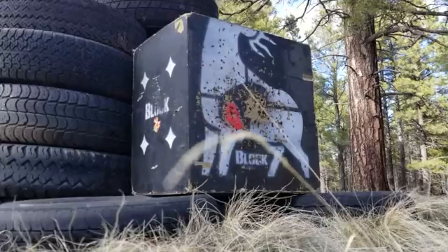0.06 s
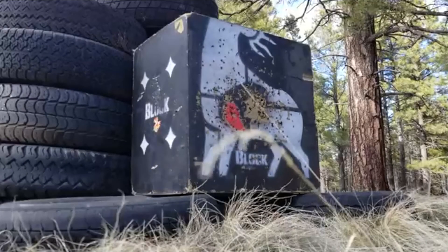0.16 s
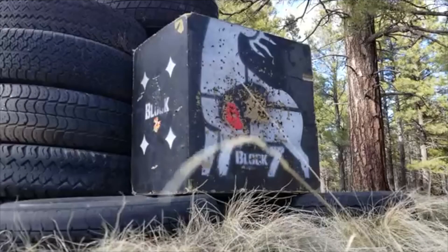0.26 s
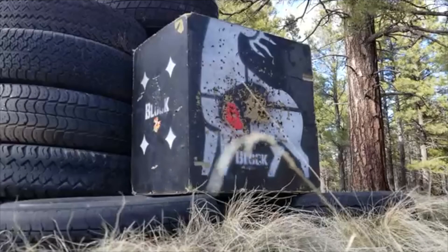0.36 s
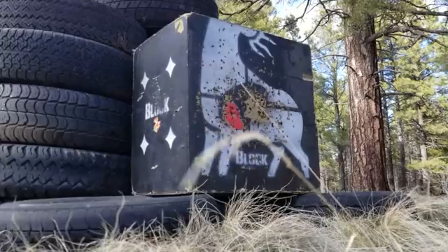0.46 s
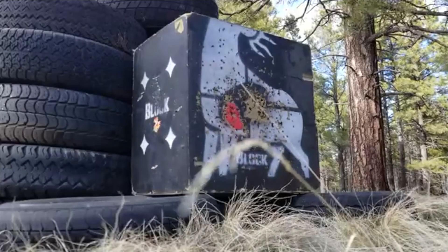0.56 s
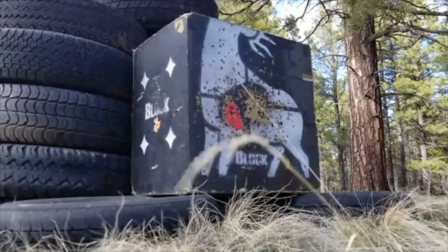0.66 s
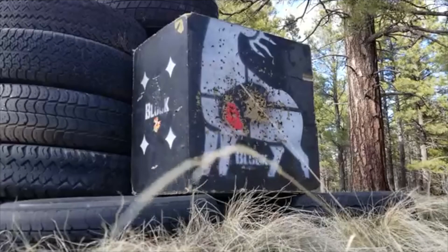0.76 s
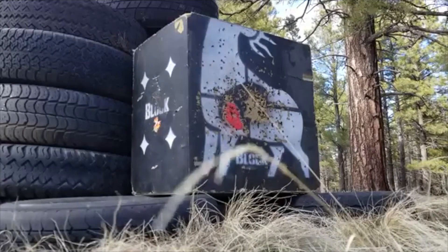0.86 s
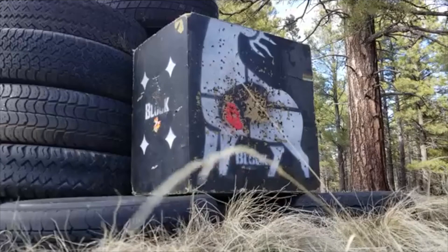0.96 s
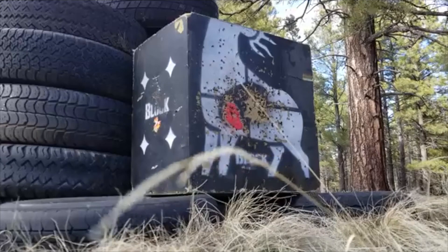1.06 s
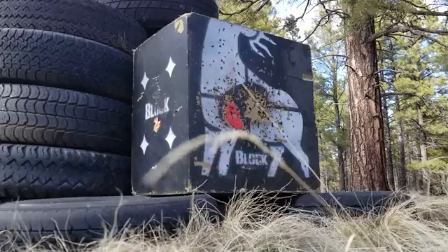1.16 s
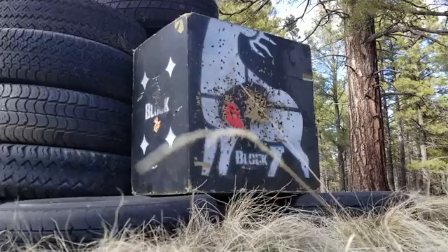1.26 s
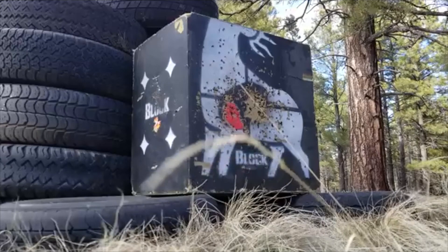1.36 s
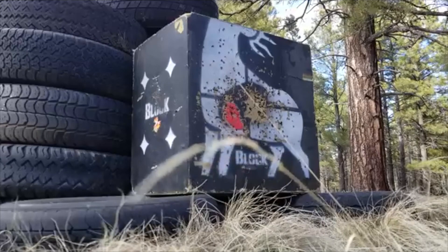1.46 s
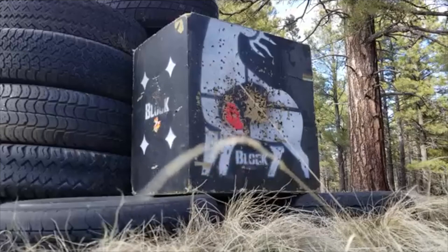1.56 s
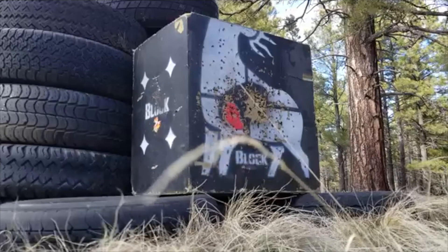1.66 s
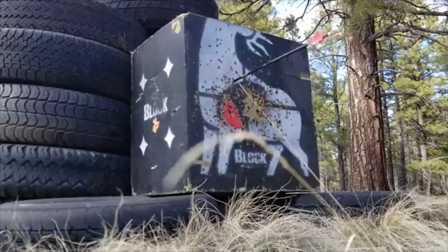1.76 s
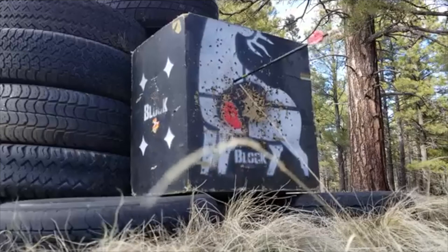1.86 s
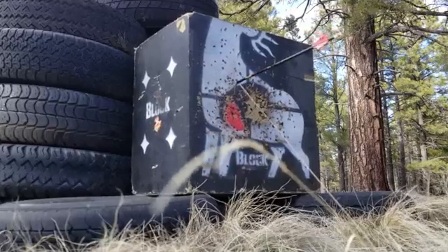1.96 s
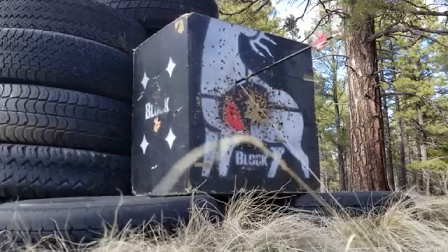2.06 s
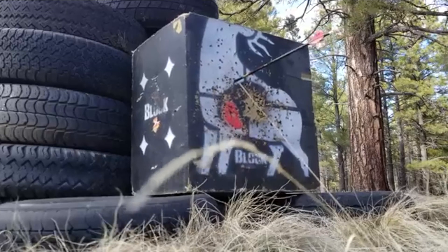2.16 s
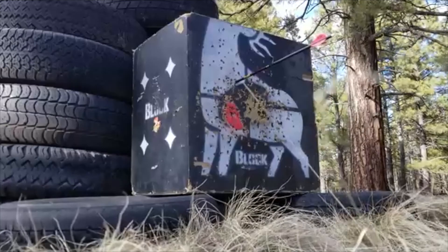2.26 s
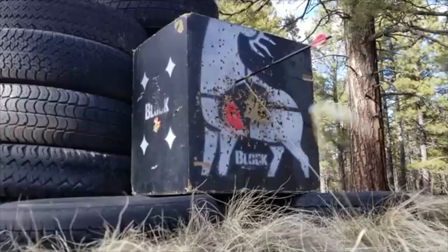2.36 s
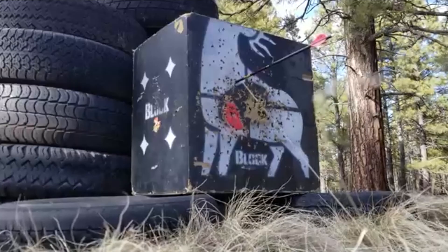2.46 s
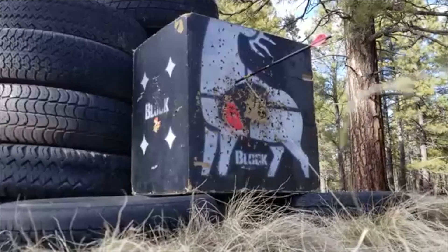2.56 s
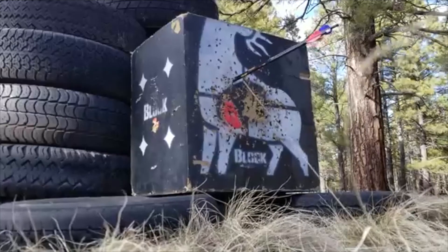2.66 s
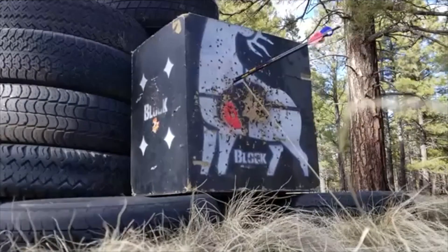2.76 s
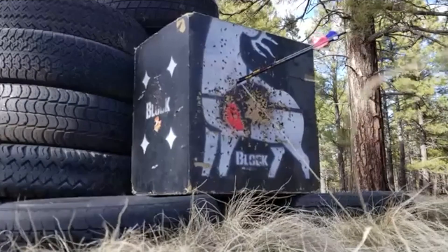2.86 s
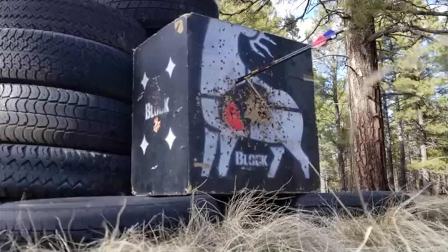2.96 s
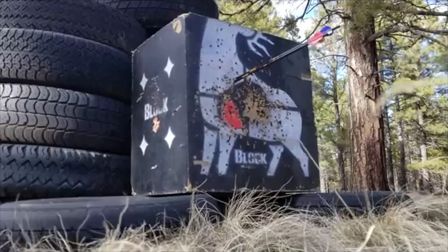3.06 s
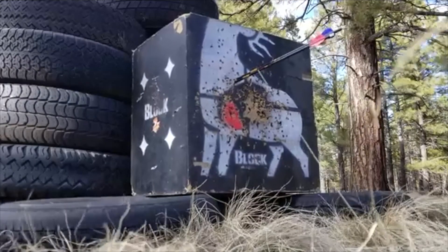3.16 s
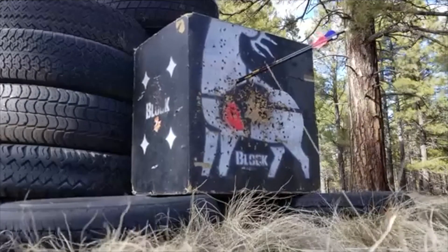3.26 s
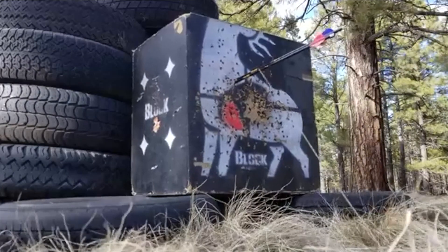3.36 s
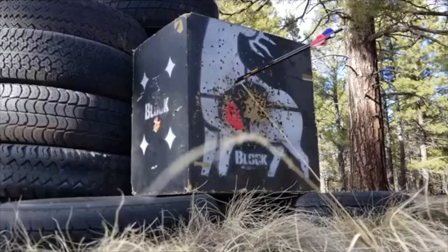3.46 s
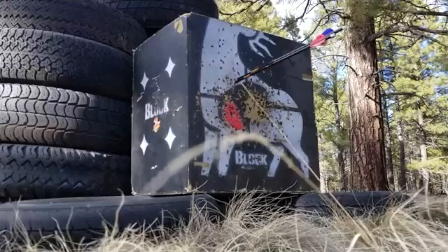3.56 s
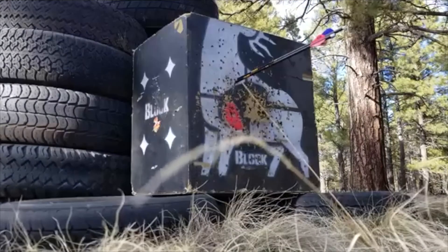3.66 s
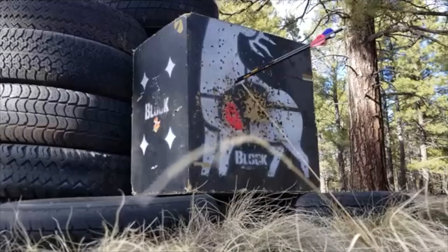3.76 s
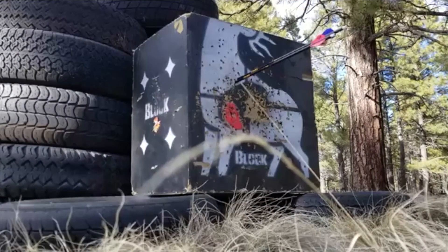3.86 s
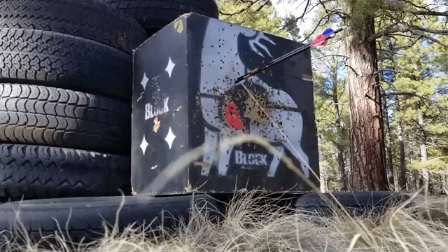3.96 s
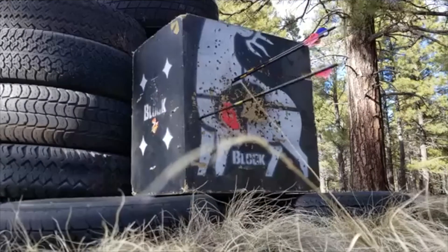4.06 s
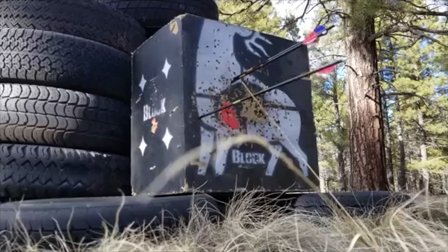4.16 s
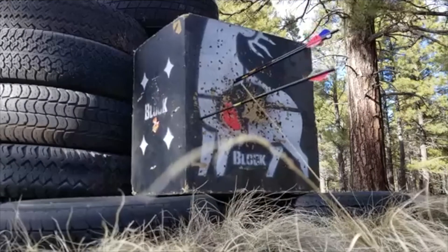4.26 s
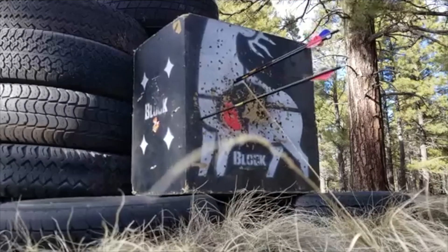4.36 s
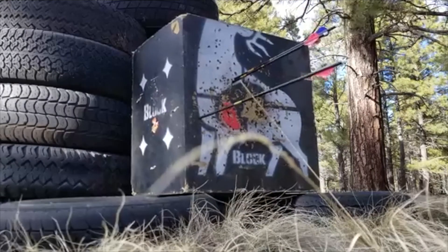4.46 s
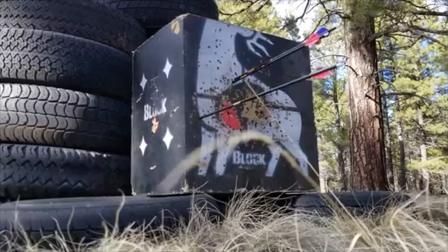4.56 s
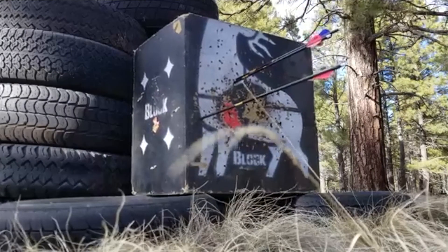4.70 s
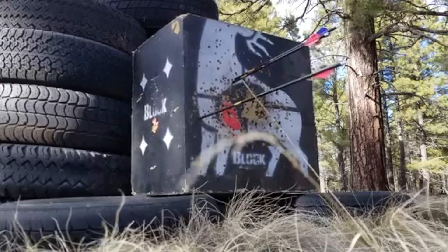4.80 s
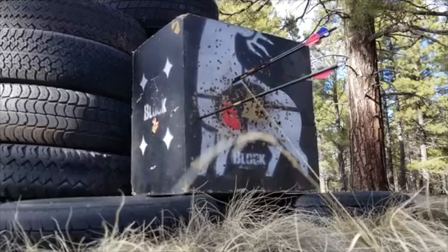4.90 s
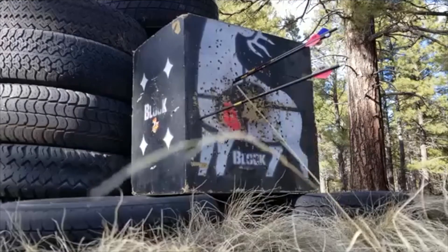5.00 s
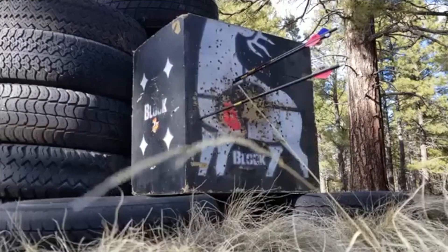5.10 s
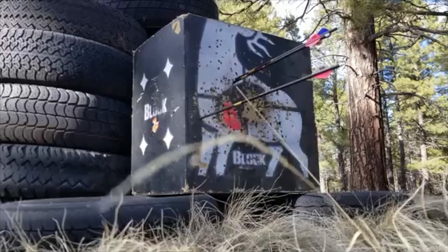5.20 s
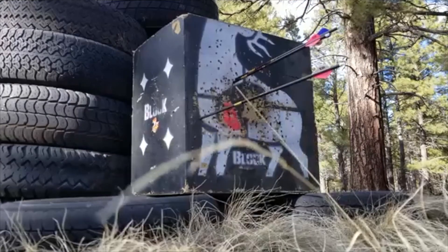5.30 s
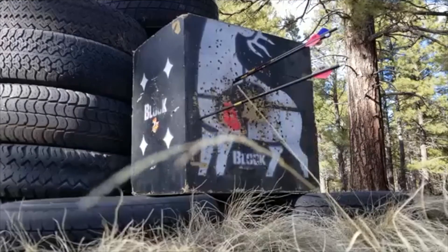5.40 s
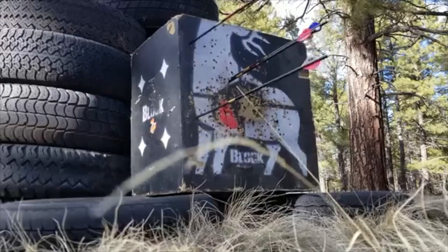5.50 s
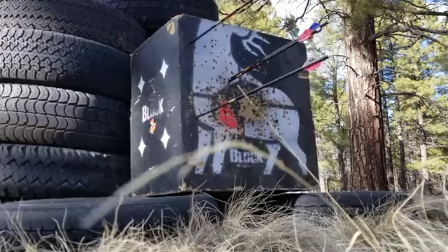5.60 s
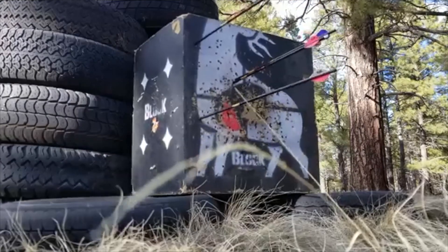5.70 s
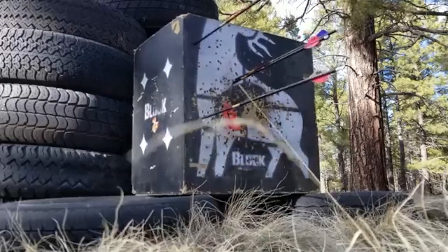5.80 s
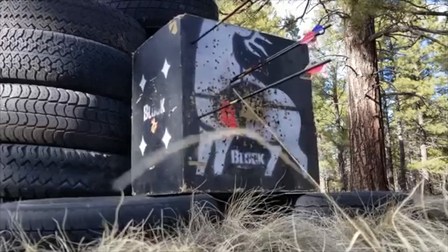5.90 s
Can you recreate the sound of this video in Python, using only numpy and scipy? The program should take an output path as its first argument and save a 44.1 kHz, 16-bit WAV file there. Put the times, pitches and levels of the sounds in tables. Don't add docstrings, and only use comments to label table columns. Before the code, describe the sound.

In a quiet pine wood, four sharp arrow hits crack and thump into a foam target, each followed by a brief scattered echo.

```python
import sys
import numpy as np
from scipy import signal
from scipy.fft import rfft, irfft
from scipy.io import wavfile
from scipy.ndimage import uniform_filter1d

SR = 44100
rng = np.random.default_rng(int(sys.argv[2]) if len(sys.argv) > 2 else 0)


def boost(x):
    u = np.asarray(x, float) / 20
    return 10 ** u


def unload_audio(sound):
    columns = np.transpose(np.atleast_2d(sound))
    steps = np.round(np.clip(columns, -1, 1) * 32767)
    wavfile.write(sys.argv[1], SR, steps.astype(np.int16))


N = 261954
T = np.arange(N) / SR

# (start t/s, crown roar level/dB, gain sinks after the hit by/dB)
TAKES = [
    (0, -63, 6.5),
    (2.322, -61, 10.5),
    (3.457, -64.5, 10.5),
    (5.056, -64.5, 8.5),
]
# (tip lands t/s, vane hiss level/dB, tilt/dB per octave, forest level/dB)
ARROWS = [
    (1.7356, 2.8, -1.3, -4),
    (2.6447, 1.5, -0.55, 0.05),
    (4.0424, 1.3, 1, 0.2),
    (5.4758, 2.73, -1.5, 2.5),
]
# (shove t/s, lateness of the lows/s, rocks back t/s, share)
SHOVES = [
    (1.7402, 0.004, 1.7587, -0.22),
    (2.6507, 0.0027, 2.6722, -0.15),
    (4.0456, 0.0027, 4.0643, 0.33),
    (5.4813, 0.0015, 5.4963, -0.1),
]


def shape(spectrum, hz):
    f, db = np.transpose(spectrum)
    return boost(np.interp(np.log(hz + 1), np.log(f), db))


def noise(gain, size=N):
    x = irfft(rfft(rng.standard_normal((2, size))) * gain(np.fft.rfftfreq(size, 1 / SR)), size)
    return x / x.std()


def bell(hz, centre_hz, width_hz):
    return np.exp(-2 * ((hz - centre_hz) / width_hz) ** 2)


def walk(rate):
    k = int(SR / rate)
    held = np.repeat(rng.standard_normal(N // k + 1), k)
    return 1.3 * uniform_filter1d(uniform_filter1d(held, k), k)[:N]


def ring(modes, since):
    t = np.maximum(since, 0)
    return sum(boost(db - 60 * t / t60) * np.sin(2 * np.pi * hz * t) for hz, db, t60 in modes)


def pan(db):
    return boost(np.array([[db], [-db]]) / 2)


def take_at(t):
    return np.searchsorted(np.array(TAKES)[1:, 0], t, side="right")


def duck_db(sink_s):
    take = take_at(T)
    since = np.maximum(T - np.array(ARROWS)[take, 0], 0)
    return -np.array(TAKES)[take, 2] * (1 - np.exp(-(since / sink_s) ** 0.76))


def background():
    # (f/Hz, level/dB per Hz)
    roar_spectrum = [(15, -39), (25, -13), (81, -2), (144, -1.5), (172, -7.5), (200, -7), (283, -11),
                     (312, -10.5), (371, -13.5), (787, -20), (991, -24.5), (1540, -40.5), (2500, -54),
                     (3250, -83.5), (5500, -120)]
    # (f/Hz, level/dB per Hz)
    hiss_spectrum = [(1200, -20), (2000, 1), (3000, 1.5), (5000, -2), (9000, -3.5), (12000, 0), (14500, 0),
                     (16000, -17)]
    lag_s, alike_hz = .00048, 800
    dulling = .06
    roar, swell, sunk_db = 0, walk(1.5), duck_db(.34)
    for centre in 20 * 2 ** np.arange(0, 8, .5):
        common, own = noise(lambda hz: bell(hz, centre, centre * 0.58))
        other = np.roll(own, N // 2)
        apart = min((centre / alike_hz) ** 1.2, 4)
        late = np.roll(common, round(lag_s * SR))
        band = np.array([common + apart * own, late + apart * other]) / np.hypot(1, apart)
        flicker_db = 1.0 * swell + 0.98 * walk(4.9)
        extra_duck_db = dulling * np.log2(centre / 200) * sunk_db
        roar = roar + band * np.sqrt(centre) * boost(flicker_db + extra_duck_db)
    roar = irfft(rfft(roar) * shape(roar_spectrum, np.fft.rfftfreq(N, 1 / SR)), N)

    starts, roar_db, _ = np.array(TAKES)[take_at(T)].T
    fade_db = -1.5 * np.exp(-(T - starts) / .021) * (starts > 0)
    roar = roar / roar.std() * boost(18.5 + roar_db + fade_db + sunk_db) * pan(-1.6)
    hiss = noise(lambda hz: shape(hiss_spectrum, hz)) * boost(-76.5 + .95 * duck_db(.13))
    return roar + hiss


def buffet():
    # (peak t/s, level/dB, swell and fade/dB per s)
    gusts = [
        [(1.7, -47.5, 34.5), (2.7, -44.5, 23), (3.2, -30.5, 71.5), (3.47, -63, 5), (5.07, -60, 0)],
        [(.5, -69, 2.5), (2.34, -42.5, 33.5), (3.05, -43, 21), (3.44, -33, 29.5), (3.47, -73.5, 5.5),
         (5.07, -62, 2.5)],
    ]
    # (f/Hz, level/dB per Hz)
    rumble_spectrum = [(12, -35.5), (20, -6), (65, 4.5), (123, -2), (255, -17.5), (455, -30.5), (560, -30),
                       (700, -41), (910, -66.5), (1540, -120)]
    # (t/s, peak level/dB, f/Hz)
    port_eddies = [
        [(2.828, -25.5, 107), (2.885, -25, 88), (3.033, -28, 117), (3.056, -28, 160), (3.075, -31.5, 130),
         (3.11, -30, 130), (3.128, -26.5, 110), (3.144, -26, 204), (3.228, -30.5, 130), (3.246, -25, 190),
         (3.306, -28, 150), (3.355, -29.5, 101), (3.41, -31, 100)],
        [(2.885, -31.5, 79), (2.945, -34, 100), (3.022, -30, 102), (3.07, -38, 110), (3.26, -28.5, 70),
         (3.293, -27, 110), (3.356, -27.5, 97), (3.445, -27.5, 109)],
    ]
    eddy_turns = [0.62, 1.097]
    bite, bite_times = .08, 2.4
    wind = []
    for port in gusts:
        wind.append(sum(boost(db - slope * np.abs(T - s)) * (take_at(T) == take_at(s)) for s, db, slope in port))
    lumps_db = np.array([3.5 * walk(24), 3.8 * walk(20)]) + duck_db(.34)
    out = noise(lambda hz: shape(rumble_spectrum, hz)) * boost(lumps_db) * wind

    for port, eddies in enumerate(port_eddies):
        for (at, db, hz), (turn, glide) in zip(eddies, rng.uniform(-0.86, 1, (len(eddies), 2))):
            near = slice(round((at - .05) * SR), round((at + .05) * SR))
            t, length = T[near] - at, eddy_turns[port] / hz
            swing = np.sin(2 * np.pi * hz * t * (1 + .15 * glide * t / length) + np.pi * turn)
            ripple = bite * np.sin(2 * np.pi * bite_times * hz * t + np.pi * glide)
            out[port, near] += boost(db) * np.exp(-(t / length) ** 2) * (swing + ripple)
    before = 3.4572 - T
    step = boost(-39) * pan(-14) * (before > 0) * np.exp(-np.abs(before) / .003)
    return out - step


def ticks():
    # (t/s, level/dB, centre f/Hz, width/Hz, t60/s)
    bursts = [(1.236, -66, 6460, 6000, .03), (1.249, -74, 4460, 7000, 1), (3.287, -66, 8000, 12000, .01),
              (3.295, -68, 8080, 12000, .01), (3.55, -76, 4000, 5000, 0.6),
              (4.064, -38, 8960, 11000, 0.014), (4.107, -50, 8000, 10620, 0.026),
              (4.129, -61.5, 10000, 8000, .015), (1.757, -55, 9500, 10940, 0.013),
              (2.325, -74, 3010, 5000, 0.041)]
    out = np.zeros((2, N))
    t = np.arange(SR // 2) / SR
    for s, db, centre_hz, width_hz, t60 in bursts:
        at = round(s * SR)
        burst = noise(lambda hz: bell(hz, centre_hz, width_hz), size=len(t))
        out[:, at:at + len(t)] += burst * boost(db - 60 * t / t60)
    return out


def flight(t, shot):
    # (f/Hz, left level/dB, right level/dB, late/s)
    vanes = [(1300, -9, -15, 0.021), (2520, 4.5, -1.5, .012), (4200, 2.5, 0.5, .006),
             (6800, -2, -4.5, 0.00019), (10500, -2, 0.5, 0.0092), (14100, -6.5, 3, .002)]
    # (before landing t/s, level/dB)
    ports = [
        (0, -46.5),
        (.008, -35.5),
    ]
    clear_db = [-24.5, -19.5, -24.5, -29.5]
    lands, db, tilt_db, _ = ARROWS[shot]
    speed_m_s, miss_m = 60, .72
    fall_db = 38.5
    clear_s, clear_rise_s = .125, .025
    closest, port_db = np.transpose(ports)[..., None]
    out = 0
    for centre, left, right, late in vanes:
        age = (t - lands) * (1 + late / .02)
        away = np.hypot(1, (age + closest) * speed_m_s / miss_m)
        far = boost(clear_db[shot]) / np.sqrt(away) * np.clip((age + clear_s) / clear_rise_s, 0, 1)
        swell = boost(port_db + [[left], [right]]) * np.hypot(boost(-fall_db * np.log10(away)), far)
        flutter_db = 1.5 * walk(150)[:len(t)] + tilt_db * np.log2(centre / 5000)
        band = noise(lambda hz: bell(hz, centre, centre * .6), size=len(t))
        out = out + band * swell * boost(flutter_db)
    out = out * (t < lands)
    out = out + .25 * np.roll(out, round(.00016 * SR), axis=1)
    return out * boost(db - 2.5)


def snaps(t):
    # (t/s, sharpness 0-1, left minus right level/dB)
    skin_bursts = [(1.73598, .45, -2), (2.64538, .5, -2), (4.04300, .65, -2), (5.47576, .7, -3)]
    # (t/s, peak level/dB, sharpness 0-1, left minus right level/dB, direction)
    snap_backs = [(1.73630, -11, .3, -2, -1), (1.73655, -12, .3, -2, 1), (2.64615, -12, .4, -1, -1),
                  (4.04310, -7, .8, -2, -1), (4.04328, -7, .9, -3, 1), (4.04341, -4.5, 1, -3, 1),
                  (5.47586, -3, .95, -3, -1), (5.4762, -7, .85, -4, 1), (5.4783, -15, .1, -7, -1),
                  (5.4788, -14, .1, -7, -1)]
    # (f/Hz, level/dB, t60/s)
    shaft = [(1000, -9, .004), (1900, 1, .0036), (3400, -4, .002), (5200, -4, .0022), (8000, -3, .003),
             (10500, -4, .0026), (13500, -6, .002)]
    foam_damp = .65
    touches = [(s - .00016, -11.5, sharp - .27, pan_db, 1) for s, sharp, pan_db in skin_bursts]
    bursts = [(s, -1.6, sharp, pan_db, 1) for s, sharp, pan_db in skin_bursts]
    out, since = np.zeros((2, len(t))), np.arange(300) / SR
    for s, db, sharp, pan_db, direction in touches + bursts + snap_backs:
        at = round((s - t[0]) * SR) - 2
        if 0 <= at < len(t):
            modes = []
            for hz, mode_db, t60 in shaft:
                bright_db = 8 * (sharp - .5) * np.log2(hz / 2000)
                modes.append((hz, mode_db + bright_db, t60 * (foam_damp if hz > 2000 else 1)))
            body, edge = ring(modes[:2], since + .00008), ring(modes[2:], since)
            left, right = body + boost(4.0) * np.roll(edge, shift=1), body + edge
            spike = np.array([left, right]) / right.max()
            out[:, at:at + len(since)] -= direction * spike * boost(db) * pan(pan_db) * boost(pan_db / 2)
    return out


def scrape(t, shot):
    # (level/dB, length/s, squeak f/Hz, grit level/dB)
    scrapes = [
        (-23.5, 0.013, 950, -7.5),
        (-30.5, 0.011, 1400, -1.5),
        (-28.5, 0.012, 1500, 6.5),
        (-22, 0.0079, 1810, 5.5),
    ]
    db, length, squeak_hz, grit_db = scrapes[shot]
    part = (t - ARROWS[shot][0]) / length
    squeak = noise(lambda hz: bell(hz, squeak_hz, 1100), size=len(t))[0] * np.exp(-np.abs(part) ** 3.0)
    grit = noise(lambda hz: bell(hz, 6000, 9000), size=len(t)) * boost(grit_db - 34 * np.abs(part))
    return boost(db) * (part > 0) * (squeak * pan(-1.5) + grit * pan(-5.0))


def boom(t, shot):
    # (f/Hz, level/dB, t60/s, direction)
    modes_1 = [(114, -28.7, 0.124, 1), (175, -10.5, 0.032, -1), (274, -12.8, 0.094, 1),
               (342, -13.1, 0.057, -1), (456, -9.7, 0.023, 1), (560, -21.0, 0.015, 1),
               (895, -23.0, 0.03, -1), (172, -27, 0.17, 1)]
    modes_2 = [(144, -19.5, 0.099, -1), (180, -21.4, 0.119, -1), (293, -11.3, 0.039, 1),
               (331, -9.8, 0.033, -1), (493, -9.0, 0.015, 1), (844, -22.4, 0.019, 1),
               (996, -22.7, 0.015, -1), (272, -25, 0.2, 1)]
    modes_3 = [(126, -27.4, 0.13, -1), (178, -14.2, 0.185, -1), (250, -17.0, 0.081, 1), (355, -24, 0.12, 1),
               (557, -17, 0.04, 1), (704, -24.6, 0.028, 1), (844, -30.2, 0.038, 1), (522, -22, 0.11, 1),
               (1017, -35, 0.08, 1)]
    modes_4 = [(156, -16.3, 0.054, -1), (199, -27, 0.32, -1), (247, -12.8, 0.047, -1),
               (342, -14.1, 0.061, 1), (542, -16.2, 0.043, 1), (797, -15.7, 0.015, 1),
               (1230, -22.3, 0.02, 1), (110, -30, 0.17, -1)]
    trim_db = [0.1, 0.12, 0.15, 0.14]
    place_db = [-1, -2, -2.5, -3.5]
    s, late, rocks, share = SHOVES[shot]
    out = 0
    for hz, db, t60, direction in [modes_1, modes_2, modes_3, modes_4][shot]:
        since = t - late * np.sqrt(300 / hz)
        mode = [(hz, db, t60)]
        out = out + direction * (ring(mode, since - s) + share * ring(mode, since - rocks))
    return out * boost(trim_db[shot]) * pan(place_db[shot])


def forest(t, shot):
    # (f/Hz, near echo level/dB, scatter level/dB, scatter t60/s)
    bands = [(320, -45, -43.5, 0.4), (600, -54.5, -51, 0.31), (1120, -56.5, -53.5, .35),
             (2120, -58, -53.5, .32), (3500, -59, -57.5, 0.38), (5900, -57, -56, .31),
             (8950, -57.5, -58, 0.35), (12800, -55, -56, 0.29)]
    tail_stretch = [0.94, .8, 0.97, 0.93]
    lands, _, _, db = ARROWS[shot]
    since, size = t - lands, len(t)
    echo_s, echo_t60_s = .019, .07
    out = 0
    for centre, echo_db, scatter_db, t60 in bands:
        echo = boost(echo_db - 60 * (since - echo_s) / echo_t60_s) * (since > echo_s) * pan(-5)
        fade_db = -60 * np.abs(since / t60 / tail_stretch[shot]) ** 1.25
        scatter = boost(scatter_db + fade_db) * np.clip(since / echo_s, 0, 1) ** 5 * pan(-1.5)
        patches = boost(2.0 * walk(73)[:size])
        band = noise(lambda hz: bell(hz, centre, centre * .55), size=size)
        out = out + band * (echo + scatter) * patches
    return out * boost(db)


def tyre_hum(t, shot):
    # (f/Hz, level/dB, t60/s)
    hums = [
        (170, -25, .2),
        (190, -34, .2),
        (178.3, -37, 0.68),
        (522, -42, 0.18),
    ]
    return ring([hums[shot]], t - SHOVES[shot][2])


def scene():
    out = background() + buffet() + ticks()
    for shot, (lands, _, _, _) in enumerate(ARROWS):
        span = slice(round((lands - .4) * SR), round((lands + 0.37) * SR))
        t = T[span]
        out[:, span] += flight(t, shot) + snaps(t) + scrape(t, shot)
        out[:, span] += boom(t, shot) + forest(t, shot) + tyre_hum(t, shot)
    return out


def top_cut(x):
    return signal.sosfilt(signal.butter(12, 16820, fs=SR, output="sos"), x)


def record(dry):
    soft = signal.sosfiltfilt(signal.ellip(10, .2, 50, 15000, fs=SR, output="sos"), dry)
    top = signal.sosfiltfilt(signal.butter(6, 15900, fs=SR, output="sos"), dry - soft)
    loud = np.clip(uniform_filter1d(np.abs(top), 96) * 100, 0, 1) ** 3
    edges = np.clip(np.minimum(T, T[-1] - T) / .004, 0, 1)
    mix = np.clip((soft + .8 * loud * top) * edges, -.8, .8)
    return top_cut(mix)


dry = scene()
out = record(dry)
unload_audio(out)
```